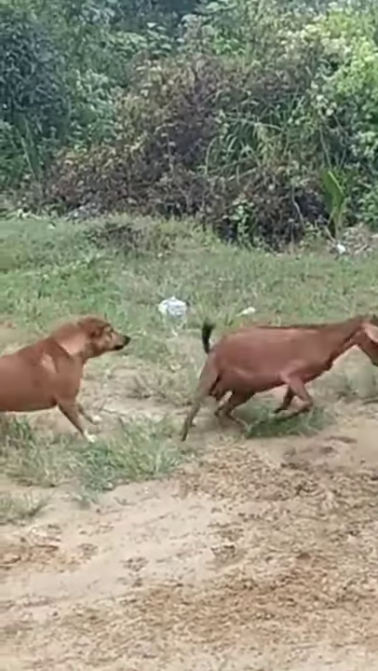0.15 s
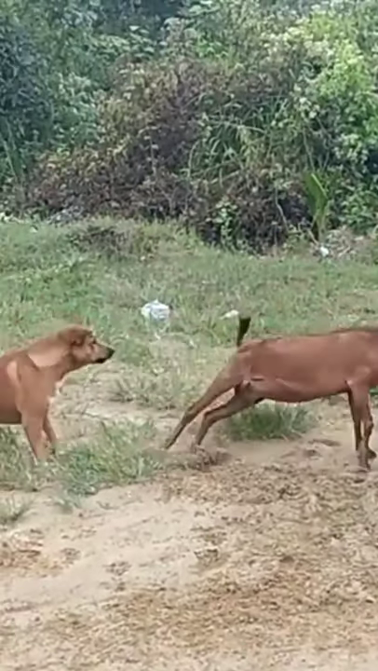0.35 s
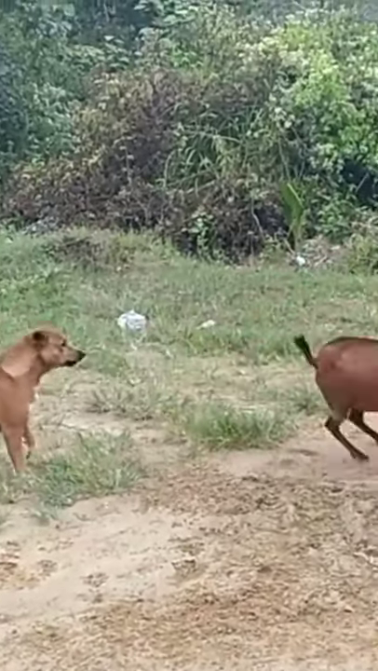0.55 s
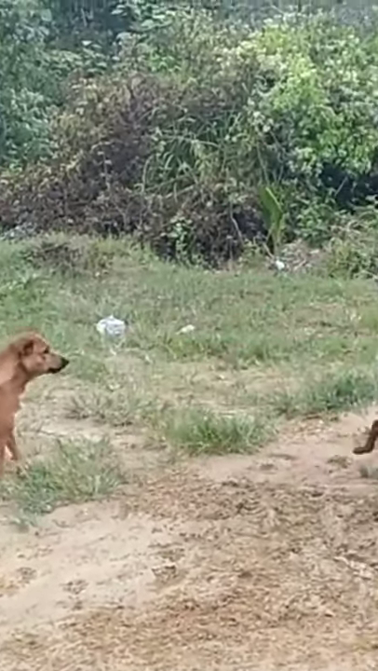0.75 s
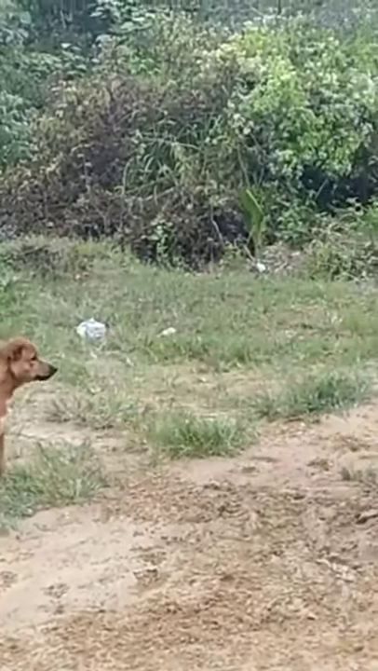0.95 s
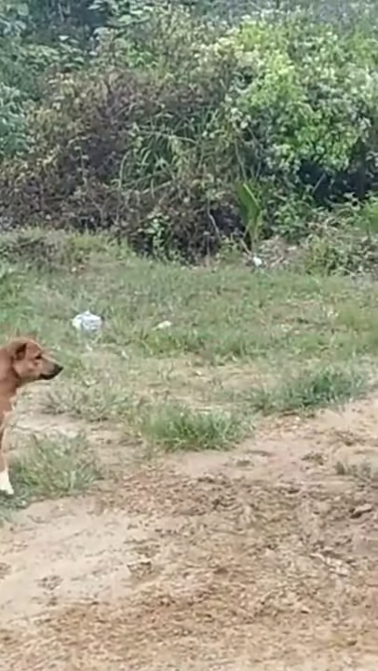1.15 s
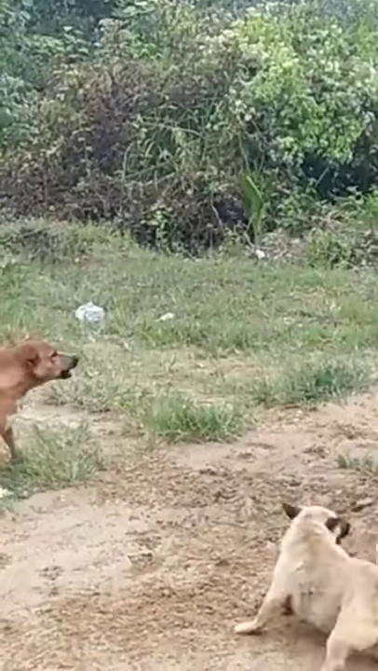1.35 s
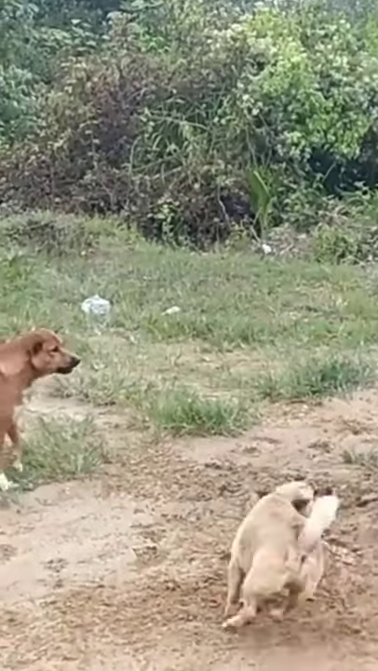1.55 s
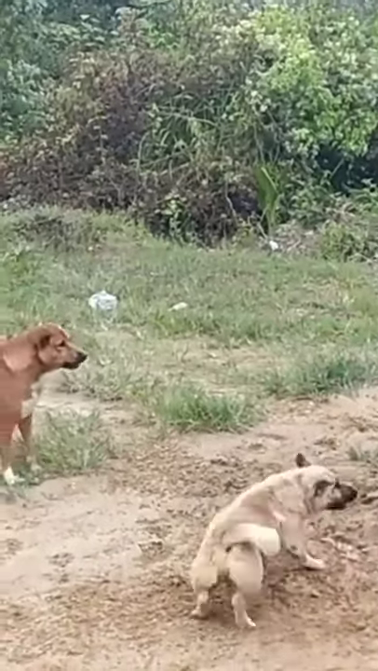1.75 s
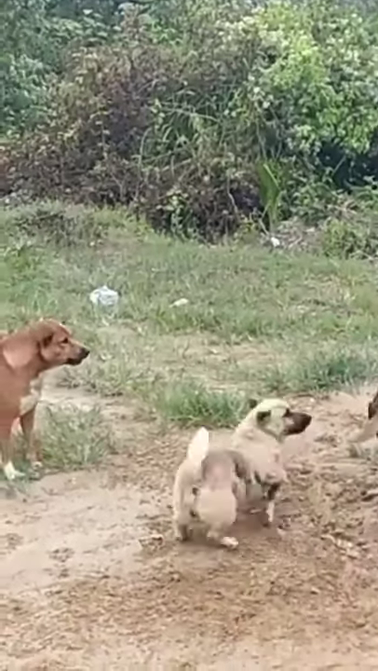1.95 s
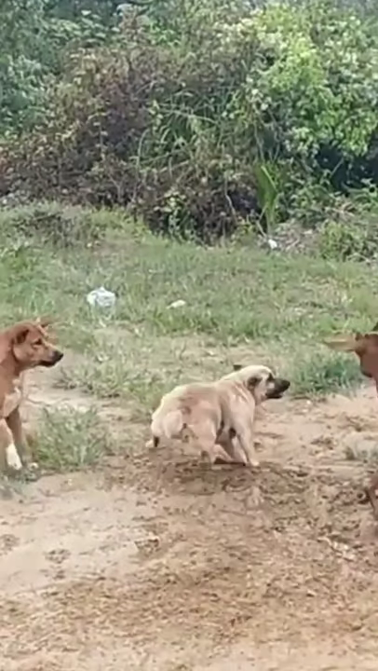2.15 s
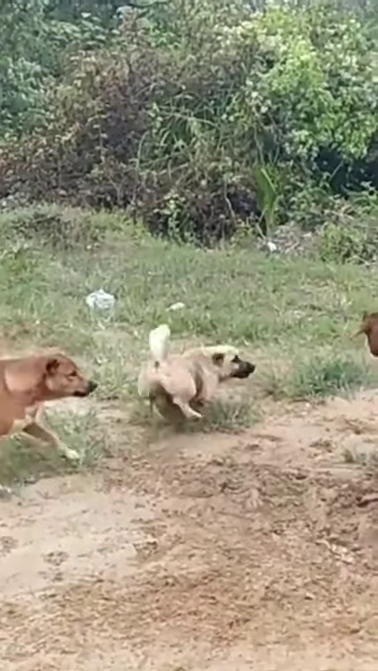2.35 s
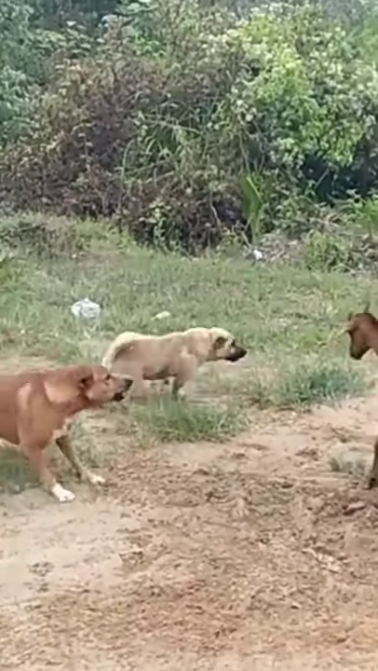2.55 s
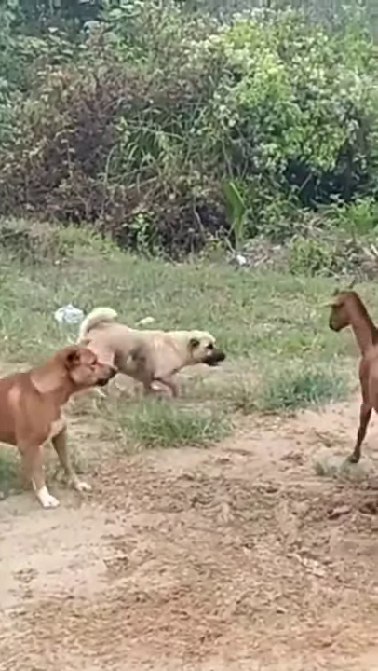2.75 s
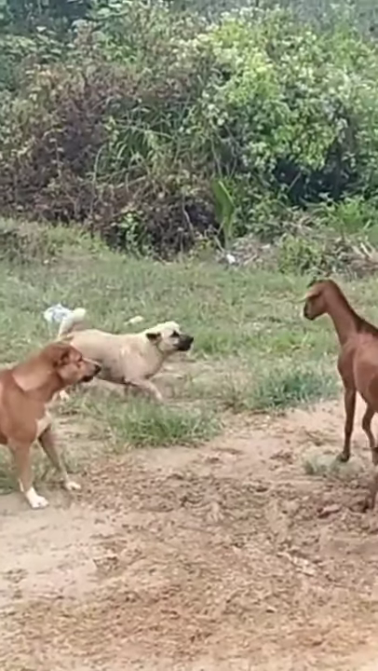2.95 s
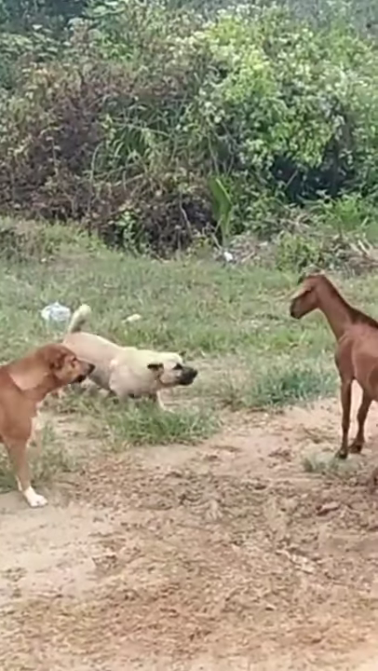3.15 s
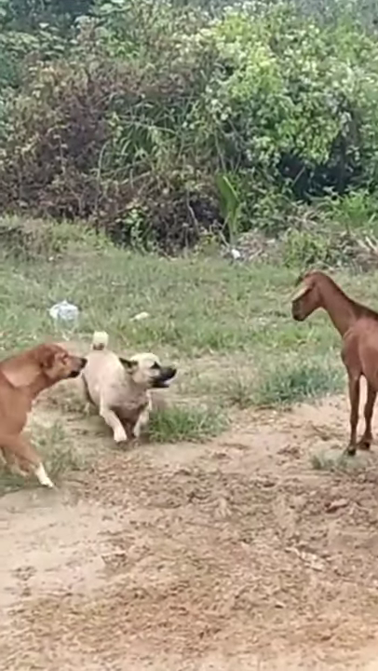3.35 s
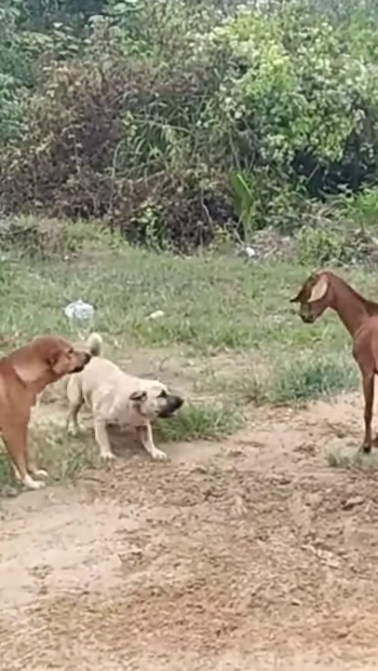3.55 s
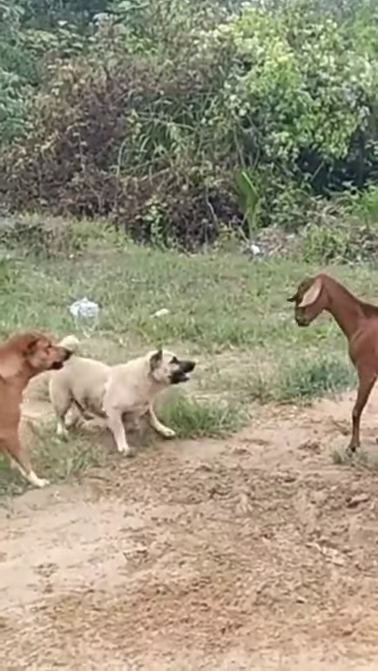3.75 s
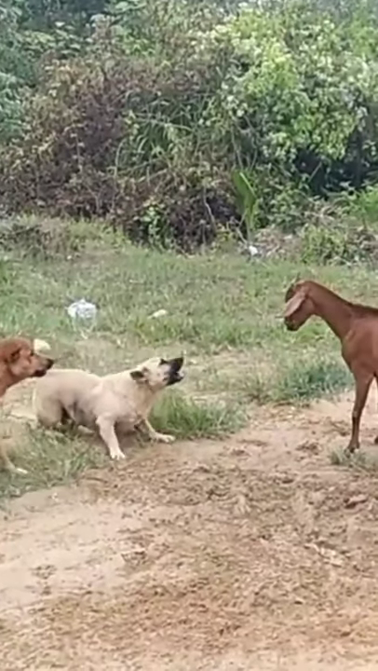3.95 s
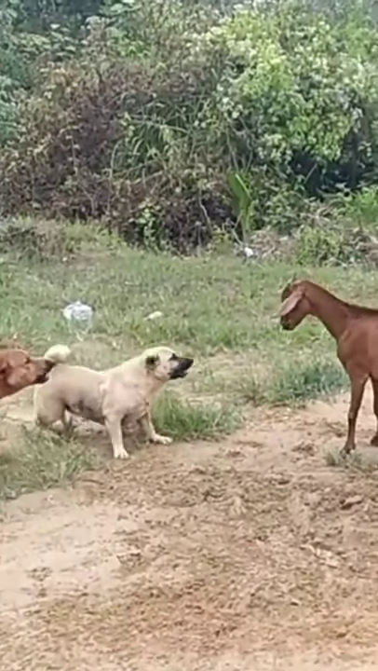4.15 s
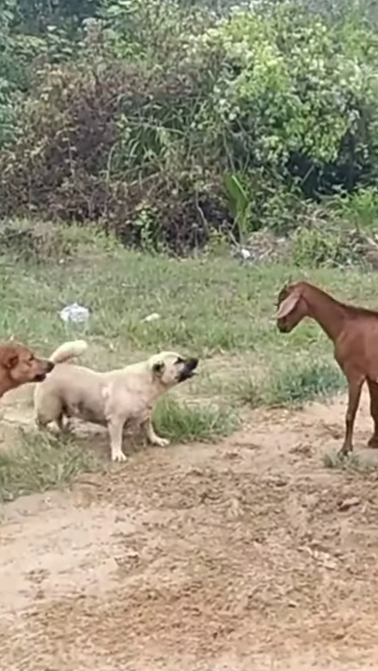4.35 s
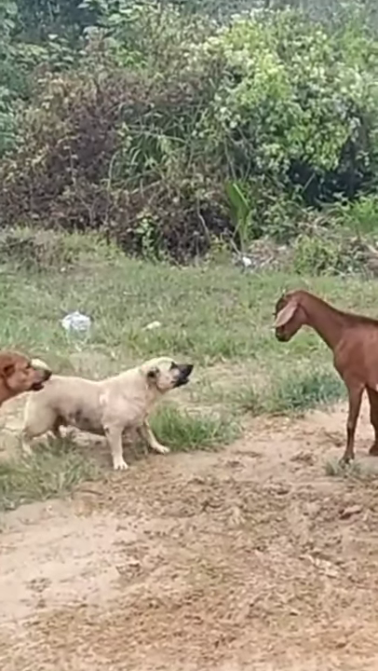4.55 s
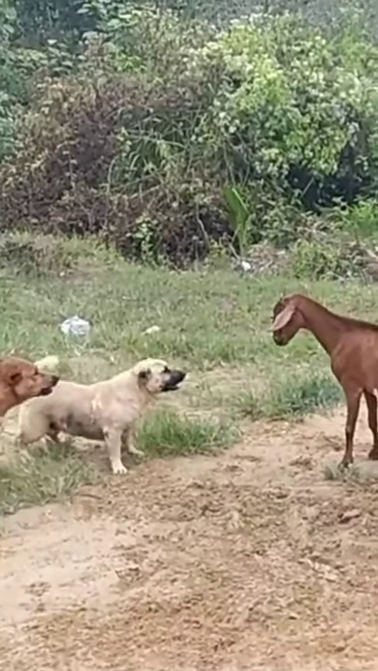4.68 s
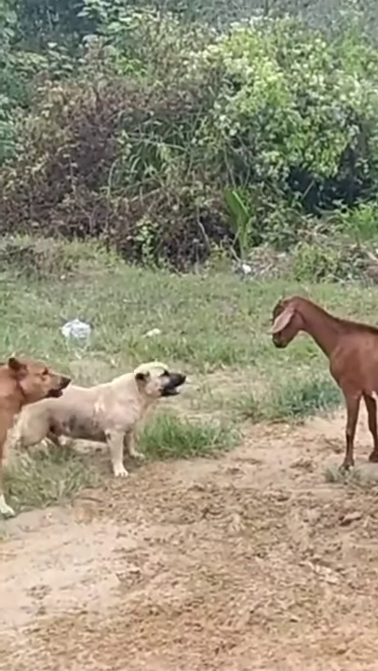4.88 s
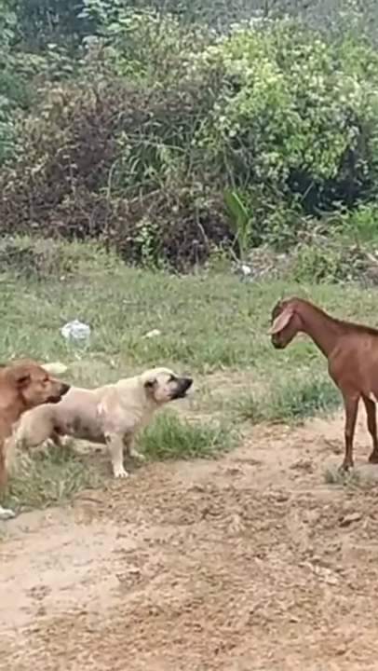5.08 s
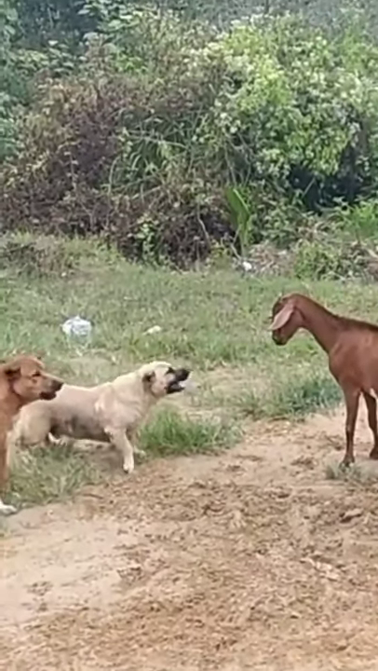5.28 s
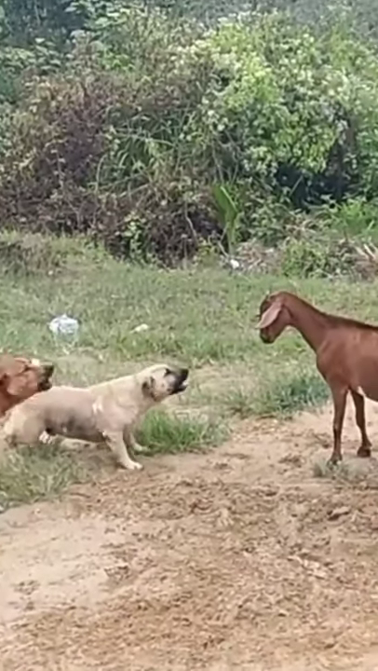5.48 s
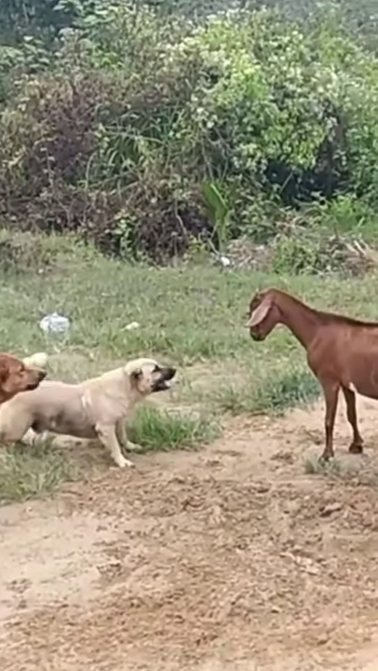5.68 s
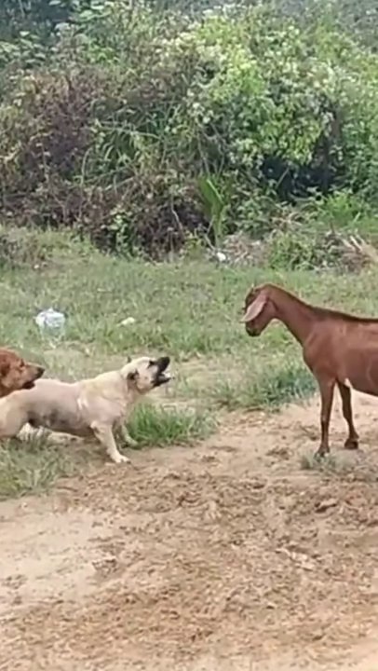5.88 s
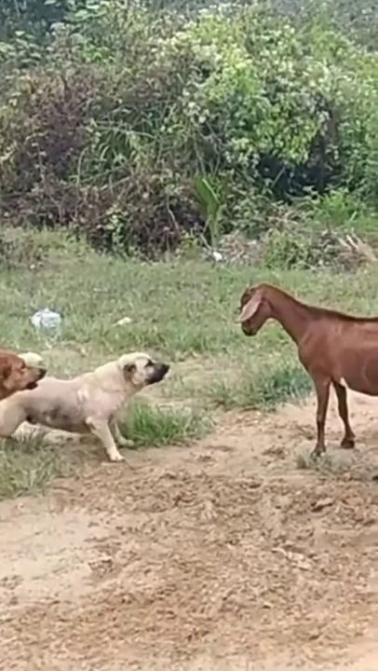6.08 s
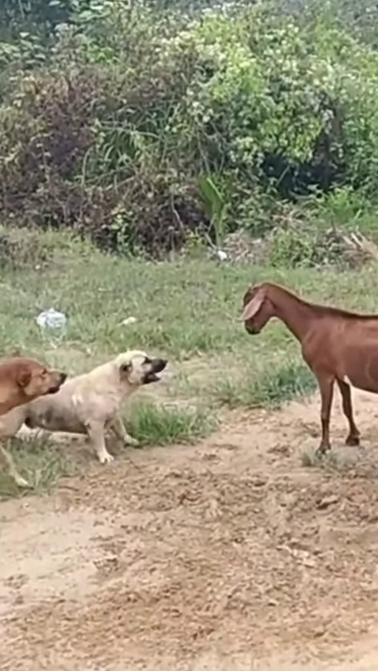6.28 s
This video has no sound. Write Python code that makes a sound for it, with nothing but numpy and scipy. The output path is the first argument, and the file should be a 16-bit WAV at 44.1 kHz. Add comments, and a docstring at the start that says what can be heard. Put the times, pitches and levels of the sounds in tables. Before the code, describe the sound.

Outdoors, close to a phone microphone, rough dog growls mix with the swish and scrape of paws and hooves in grass. The scuffling dies away and loud, raspy barks take over, separated by short pauses and sometimes doubled, each with a brief echo. A small, quiet whine slips in between them. Occasional dull thumps and a very faint background noise lie underneath.

```python
"""Two dogs facing a goat

On open ground near a phone, two dogs growl, paws and hooves scuffle in the grass, and hoarse barks
follow, with one whine. Growls and barks are source and filter: uneven vocal-fold pulses and breath
excite resonances of the vocal tract. Bushes and walls throw the calls back. The phone limits the
peaks and hears little else but dull thuds, a low drone that comes and goes, and faint steady noise."""
import sys
import numpy as np
from scipy import signal
from scipy.fft import rfft, irfft
from scipy.io import wavfile
from scipy.ndimage import uniform_filter1d, minimum_filter1d

SR = 44100
rng = np.random.default_rng(int(sys.argv[2]) if len(sys.argv) > 2 else 0)


def digitize_waveform(pressure):
    """Quantize a signal to 16-bit integers and store it at the path in sys.argv[1].

    Rows of a 2-D input are taken as channels; values are limited to [-1, 1].
    """
    field = np.atleast_2d(pressure).T
    bounded = np.clip(field, -1, 1)
    quanta = np.round(bounded * 32767).astype(np.int16)
    wavfile.write(sys.argv[1], SR, quanta)


N = 280035


def bark(rows, rough):
    """Source and filter: the folds drive throat, mouth, tongue and head resonances; the jaws hiss."""
    # head resonances at a pitch of 600 Hz: (frequency [Hz], width [Hz], gain [dB])
    head_modes = [(2447, 110, 11.5), (2968, 550, 17.5), (3584, 250, 13)]
    # turbulent air in the jaws: (frequency [Hz], spectral level [dB])
    hiss_spectrum = [(2350, -37), (4000, 6.5), (4910, -3), (5310, -4), (5630, 0), (6480, 6), (8230, 2),
                     (12200, -0.5), (15600, -14)]
    s, effort_db, hz, mouth_hz, mouth_db, tongue_hz, tongue_db, bite_db = curves(rows)
    drive, puffs = vocal_folds(hz, rough, jitter=.05, shimmer_db=5.0)
    beat = np.cumsum(120 * (1 + 0.17 * wobble(len(hz), size=500))) / SR
    flutter = np.clip(.4 - 0.036 * (effort_db + 11), 0, 1)  # slack tissue flutters more at low effort
    drive = drive * (1 + flutter * np.cos(2 * np.pi * beat))  # sidebands around each partial
    # a second vibration locks to the mouth resonance
    second, _ = vocal_folds(mouth_hz, rough + 0.21, jitter=.04, shimmer_db=4.0)
    raspy = drive + .5 * puffs  # turbulence grows towards the teeth
    lift = (hz / 600) ** 0.47  # a raised larynx shortens the tract
    head = evened(sum((-1) ** k * gain_of(db) * resonate(raspy, mode_hz * lift, width)
                      for k, (mode_hz, width, db) in enumerate(head_modes)))
    throat = resonate(drive, hz, width=330)
    mouth = resonate(second + 0.36 * drive, mouth_hz, width=560)
    tongue = resonate(drive + 0.26 * puffs, tongue_hz, width=730)
    mouth_gain = gain_of(np.minimum(mouth_db, -.3))
    voice = np.sqrt(1 - mouth_gain ** 2) * throat - mouth_gain * mouth
    voice += gain_of(tongue_db - 4.0) * tongue + gain_of(bite_db - 5.0) * head
    voice += gain_of(-15.5 + 0.33 * effort_db + 0.16 * bite_db) * coloured(puffs, hiss_spectrum)
    return s, gain_of(effort_db - 1.5) * high_pass(voice, hz=376)


def articulation(s, length, db, first_hz, last_hz, open_s, mouth_hz, open_db, shut_db,
                 tongue_hz, tongue_db, bite_db):
    """Articulation of a bark: effort swells, pitch glides, and open jaws free the upper resonances."""
    attack_s, release_s = .022, .03
    release_at, end = length - release_s / 2, length + release_s / 2
    t = np.arange(0, end, 1 / 1000)
    held = np.clip(t / release_at, 0, 1)
    stages = [0, attack_s, attack_s + 1.02 * open_s, release_at, end]
    effort_db = db + np.interp(t, stages, [-31.5, -13.5, -4, 0, -18])
    jaws_db = np.interp(t, [0, open_s, release_at, end], [-17, 0, 0, -24])
    glide_hz = first_hz + (last_hz - first_hz) * held ** .7
    sag = np.interp(t, [release_at, end], [1, .97])
    mouth_db = np.interp(t, [open_s, release_at], [open_db, shut_db])
    tiring = held - .5  # the mouth resonance and the bite sink as the jaws tire
    return np.transpose([s + t, effort_db, glide_hz * sag,
                         mouth_hz * (1 - .06 * tiring), mouth_db + jaws_db,
                         np.full(len(t), tongue_hz), tongue_db + jaws_db,
                         bite_db + jaws_db - 6 * tiring])


def vocal_folds(hz, rough, jitter, shimmer_db):
    """Glottal source: uneven pulses mixed with a puff of noise each cycle; also the puffs alone."""
    cycles = np.cumsum(hz * (1 + jitter * wobble(len(hz), size=60))) / SR
    pulses = np.diff(np.floor(cycles), prepend=0) * gain_of(shimmer_db * wobble(len(hz), size=150))
    puffs = evened((0.22 + np.exp(-(cycles % 1) / .5)) * rng.standard_normal(len(hz)))
    return (1 - rough) * evened(pulses) + rough * puffs, puffs


def growl(rows):
    """Aperiodic voicing: slow ragged pulses and much breath excite the formants of a half-shut mouth."""
    s, effort_db, throat_hz, mouth_hz, mouth_db = curves(rows)
    drive, _ = vocal_folds(np.full(len(effort_db), 100.), rough=.55, jitter=.3, shimmer_db=1.5)
    throat = resonate(drive, throat_hz, width=240) + gain_of(-13.0) * resonate(drive, 365, width=220)
    mouth = resonate(drive, mouth_hz, width=330) + gain_of(-4.5) * resonate(drive, 1450, width=650)
    return s, gain_of(effort_db) * high_pass(throat + gain_of(mouth_db) * mouth, hz=157)


def whine():
    """Nearly periodic voicing: two clear tones about an octave apart waver together."""
    # the lower tone: (time [s], pitch [Hz], level [dB])
    contour = [(4.64, 464, -18), (4.7, 466, -35.5), (4.735, 434, -20), (4.76, 458, -32.5), (4.81, 443, -22)]
    s, hz, db = curves(contour)
    upper_hz, upper_db = 967, -35
    waver = 2 * np.pi * (1 + 0.045 * wobble(len(hz), size=150)) / SR
    lower = gain_of(db) * np.sin(np.cumsum(hz * waver))
    upper = gain_of(upper_db) * np.sin(np.cumsum(upper_hz * waver))
    return s, np.sqrt(2) * (lower + upper)


def scuffle():
    """Friction noise: blades of grass swish and clumps of grit snap, swelling at each scrape."""
    # scrapes of paws and hooves: (time [s], peak level [dB])
    scrapes = [(.03, -32), (.165, -30.5), (.27, -56), (.36, -71), (.44, -54), (.6, -33.5), (.91, -37.5),
               (1.09, -30.5), (2.15, -35), (2.258, -47), (2.345, -46.5)]
    # continuous rustle under them: (time [s], level [dB])
    rustle = [(0, -41.5), (.55, -36), (.8, -41.5), (1.17, -40.5), (1.34, -60.5), (1.9, -62), (2.06, -52),
              (2.2, -57), (2.46, -60)]
    # rubbed grass: (frequency [Hz], spectral level [dB])
    grass_spectrum = [(710, -55.5), (1200, -19), (1340, -25), (1820, -32), (2990, -11), (5620, -8),
                      (7190, -6), (11600, -2.5), (15600, -9)]
    rise_s, fall_s = 0.011, 0.014
    s, db = curves(rustle)
    count = len(db)
    t = s + np.arange(count) / SR
    level = gain_of(db) + sum(gain_of(peak_db) * np.exp(np.minimum((t - at) / rise_s, (at - t) / fall_s))
                              for at, peak_db in scrapes)
    swish = rng.standard_normal(count) * gain_of(1.5 * wobble(count, size=300))
    grit = rng.standard_normal(count)
    grit *= rng.random(count) < 1500 / SR * gain_of(5.0 * wobble(count, size=400))  # sparse, in clumps
    return s, level * coloured(swish + 0.48 * evened(grit), grass_spectrum)


def thud(s, db, hz):
    """Heavy damping: a paw or a puff of breath gives a low burst of noise that does not ring."""
    t = np.arange(3500) / SR
    envelope = t / 0.036 * np.exp(1 - t / 0.012)
    return s, gain_of(db) * envelope * resonate(rng.standard_normal(len(t)), hz, width=140)


def echoes(x):
    """Reverberation: sparse reflections from bushes and walls, each band decaying at its own rate."""
    # decay by 60 dB: (frequency [Hz], reverberation time [s])
    decay_times = [(300, 0.29), (600, 0.38), (1500, 0.36), (4000, 0.38), (10000, 0.42)]
    taps = np.zeros((3, 2, SR))  # three sets of paths to two ports
    delays = np.arange(400, SR - 20, 20) + rng.integers(0, 20, (3, 2, (SR - 401) // 20))
    np.put_along_axis(taps, delays, rng.choice([-1., 1.], delays.shape), 2)
    taps[:, 1] += .5 * taps[:, 0]
    hz, t, spectra = signal.stft(taps, SR, nperseg=256)
    decay = gain_of(-60 * t / at_frequency(decay_times, hz)[:, None])
    tails = signal.istft(spectra * decay, SR, nperseg=256)[1]
    tails /= np.linalg.norm(tails[0, 0])
    # moving head, leaves and air feed the three sets in turn
    swing = np.cumsum(25 + 15 * wobble(N, size=900)) / SR
    facing = np.cos(2 * np.pi * (swing + np.arange(3)[:, None] / 3)) * np.sqrt(2 / 3)
    return signal.fftconvolve((x * facing)[:, None], tails, axes=2).sum(0)[:, :N]


def drone(s, length, db):
    """Narrow-band noise, heard as a low wavering hum that swells and fades."""
    swell = np.sin(np.pi * np.arange(0, length, 1 / SR) / length)
    return s, gain_of(db) * swell * resonate(rng.standard_normal(len(swell)), hz=71.6, width=10)


def background():
    """Stationary noise, faint and strongest in the bass."""
    # noise floor: (frequency [Hz], spectral level [dB])
    floor_spectrum = [(18, -48.5), (30, -42.5), (71, -7.5), (237, -8.5), (342, -13), (1300, -27),
                      (4920, -30.5), (15600, -34.5)]
    return gain_of(-62.5) * coloured(rng.standard_normal(N), floor_spectrum)


def ports(x):
    """Scattering: the two microphone ports agree in the bass; above it the phone scrambles the phase."""
    # likeness of the ports: (frequency [Hz], coherent gain [ratio])
    likeness = [(60, 0.96), (500, 0.95), (3000, 0.62), (5000, 0.87), (12000, 0.23)]
    hz, _, spectra = signal.stft(x, SR, nperseg=512, noverlap=384)
    coherent = at_frequency(likeness, hz)[:, None]
    phase = 2 * np.pi * 2.5 * uniform_filter1d(rng.standard_normal(spectra.shape), size=4, axis=1)
    scattered = 2.41 * np.sqrt(1 - coherent ** 2) * np.exp(1j * phase)
    right = signal.istft(spectra * (coherent + scattered), SR, nperseg=512, noverlap=384)[1][:N]
    return np.array([np.roll(x, 2), right])  # the right port is a little nearer


def resonate(x, hz, width):
    """Moving resonance by heterodyning: shift hz to zero, smooth twice, shift back; rms 1."""
    carrier = np.exp(2j * np.pi * np.cumsum(hz * np.ones(len(x))) / SR)
    pole = np.exp(-np.pi * width / SR)
    return evened((carrier * signal.lfilter([1], [1, -2 * pole, pole * pole], x / carrier)).real)


def coloured(x, points):
    """Spectral shaping to rms 1."""
    gain = gain_of(at_frequency(points, np.fft.rfftfreq(len(x), 1 / SR)))
    return evened(irfft(rfft(x) * gain, len(x)))


def high_pass(x, hz):
    """Bass cut of 24 dB per octave."""
    return signal.sosfilt(signal.butter(4, hz, "high", fs=SR, output="sos"), x)


def wobble(count, size):
    """Random fluctuation of rms 1, smoothed over size samples."""
    return evened(uniform_filter1d(uniform_filter1d(rng.standard_normal(count), size), size))


def gain_of(db):
    """Amplitude ratio of a level."""
    return 10 ** (np.asarray(db) / 20)


def evened(x):
    """Normalisation to rms 1."""
    return x / np.sqrt(np.mean(x ** 2) + 1e-20)


def at_frequency(points, hz):
    """Interpolation on a logarithmic frequency axis."""
    point_hz, value = np.transpose(points)
    return np.interp(np.log(hz + 1), np.log(point_hz + 1), value)


def curves(rows):
    """Start time, then each further column interpolated at the sample rate."""
    s, *columns = np.transpose(rows)
    t = np.arange(s[0], s[-1], 1 / SR)
    return [s[0]] + [np.interp(t, s, column) for column in columns]


def add(mix, s, sound):
    """Superposition of a sound at time s, its ends tapered."""
    part = mix[round(s * SR):][:len(sound)]
    part += sound[:len(part)] * signal.windows.tukey(len(sound), min(1, 500 / len(sound)))[:len(part)]


def scene():
    """Direct and reflected sound: all sources reach the ports; only barks and growls echo."""
    # barks: (time [s], length to mid-release [s], effort [dB], first pitch [Hz], last pitch [Hz],
    # jaw opening [s], mouth resonance [Hz], mouth level once open [dB], mouth level at release [dB],
    # tongue resonance [Hz], tongue level [dB], bite or strength of the head resonances [dB])
    barks = [(1.361, 0.14, -3, 512.8, 569.8, 0.036, 1073, -1.5, -3, 1830, -10.5, -13),
             (1.558, 0.13, 1, 621.6, 667.6, 0.025, 1190, -24, -7.5, 1900, -5.5, -12),
             (2.463, 0.17, -3, 439.1, 562.7, 0.046, 1050, -8, -3.5, 1495, -5, -16),
             (2.996, 0.13, -4, 529.7, 575.2, 0.038, 1216, -19, -10.5, 1570, -8, -13.5),
             (3.431, 0.18, -2, 453, 635, 0.039, 1009, 1.5, -14.5, 1830, -7.5, -10),
             (3.96, 0.11, -1, 591, 648, 0.025, 1186, -5, -1.5, 1650, -4.5, -4.5),
             (4.104, 0.13, -1, 527.5, 572.4, 0.027, 966, -1, -4, 1510, -7, -16.5),
             (4.505, 0.1, 0, 538.3, 626.3, 0.026, 1199, -0.4, -3, 1590, -6, -5.5),
             (4.795, .13, -2.5, 489.4, 567.2, .03, 957, -1.4, -2, 1700, -10.5, -16),
             (4.99, 0.13, -4.5, 653, 653.3, 0.017, 1207, 0, -6.5, 1697, -10, -6.5),
             (5.457, .13, 0.5, 648.5, 579.5, 0.02, 1148, -1.2, -4, 1680, -6.5, -9),
             (5.964, 0.11, -4, 580, 583, 0.02, 1176, 0.8, -4.5, 1715, -6, -4),
             (6.178, 0.13, -0.5, 575, 576, 0.025, 943, -1, -3.5, 1510, -8, -17.5)]
    # thuds of paws and low puffs of the hardest barks: (time [s], level [dB], frequency [Hz])
    thuds = [(0.231, -24, 160), (1.789, -33, 218), (2.167, -31, 82.7), (2.566, -37, 85), (2.745, -54, 72),
             (3.579, -26.5, 85), (4.201, -23, 184), (5.54, -10.5, 110.4), (6.277, -22, 158)]
    # one table a growl:
    # (time [s], effort [dB], throat resonance [Hz], mouth resonance [Hz], mouth level [dB])
    growls = [
        [(0.0, -27.5, 580, 1360, -17), (0.066, -35.5, 570, 1380, -14.5), (0.118, -43, 338, 1150, -12),
         (0.258, -34.5, 300, 990, -7.5), (0.39, -46, 302, 1020, -12.5), (0.425, -30, 560, 960, -16),
         (0.51, -27.5, 560, 962, -13), (0.64, -56, 417, 1000, 2)],
        [(0.92, -57, 641, 2150, -10), (0.94, -31, 610, 2150, -14), (1.03, -27.5, 637, 1140, -5.5),
         (1.2, -32, 597, 1170, -5.5), (1.268, -29, 585, 1200, -22), (1.36, -50, 510, 1030, -14)],
        [(1.92, -33, 561, 1610, -7), (1.942, -24, 546, 1560, -22), (2.016, -34.5, 570, 1130, -2.5),
         (2.14, -26, 620, 1300, -15), (2.21, -47.5, 600, 1040, -9.5), (2.37, -46, 510, 1006, -1.5),
         (2.46, -37.5, 440, 1040, -24)],
    ]
    # swells of the drone: (time [s], length [s], level [dB])
    drones = [(0.562, 0.69, -55), (3.745, .5, -59)]
    dogs, near = np.zeros((2, N))
    for row in barks:
        add(dogs, *bark(articulation(*row), rough=.53 + .012 * row[-1]))  # noisier with more bite
    for row in thuds:
        add(near, *thud(*row))
    for rows in growls:
        add(dogs, *growl(rows))
    for row in drones:
        add(near, *drone(*row))
    add(near, *scuffle())
    add(near, *whine())
    near += background()
    return ports(dogs + near) + gain_of(-8.0) * echoes(dogs)


def record(dry):
    """Peak limiting in the phone: port balance, a quick limiter, soft clipping, then band limits."""
    # imbalance of the ports: (frequency [Hz], left minus right [dB])
    imbalance = [(60, -2), (180, 1), (550, 1.5), (1650, 1.5), (4970, 2.5), (15000, 7)]
    tilt_db = at_frequency(imbalance, np.fft.rfftfreq(N, 1 / SR)) / 2
    x = irfft(rfft(dry) * gain_of([tilt_db, -tilt_db]), N)
    peak = -minimum_filter1d(-abs(x).max(0), size=120)
    excess_db = np.maximum(20 * np.log10(peak + 1e-9) + .5, 0)
    x = x / gain_of(.9 * uniform_filter1d(excess_db, size=100))
    x = np.tanh(1.2 * x) * .95
    x = signal.lfilter(*signal.butter(3, 62, "high", fs=SR), x)
    low_pass = signal.firwin(511, 15700, window=("kaiser", 9), fs=SR)
    return signal.oaconvolve(x, low_pass[None], "same")


dry = scene()
out = record(dry)
digitize_waveform(out)
```